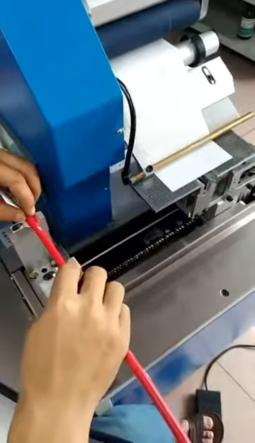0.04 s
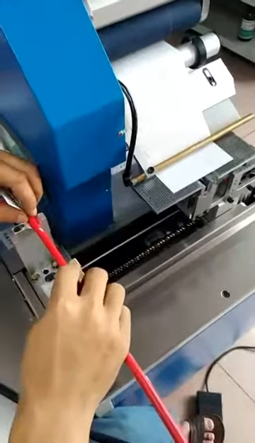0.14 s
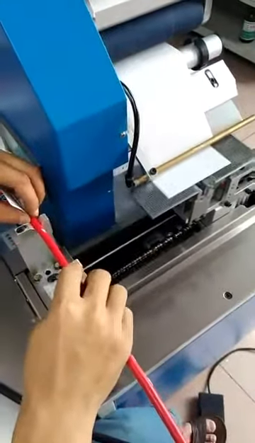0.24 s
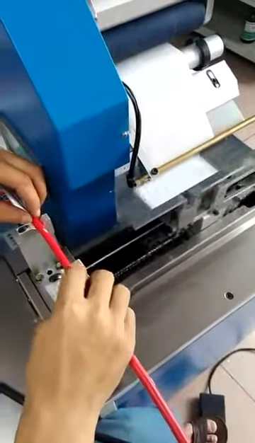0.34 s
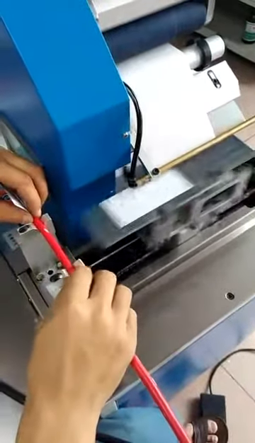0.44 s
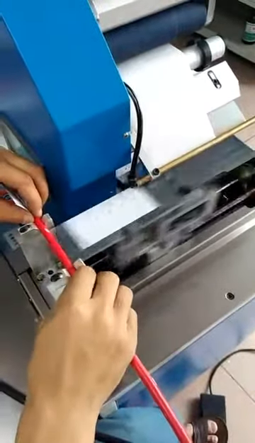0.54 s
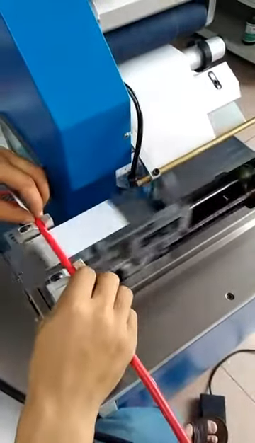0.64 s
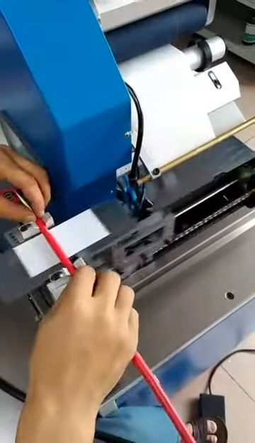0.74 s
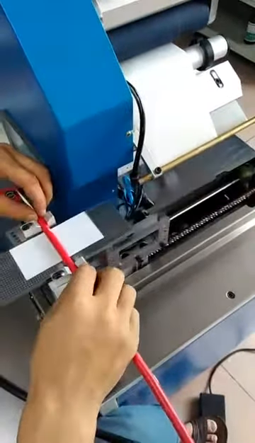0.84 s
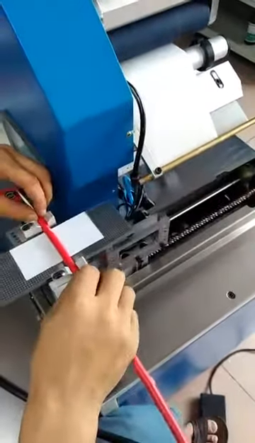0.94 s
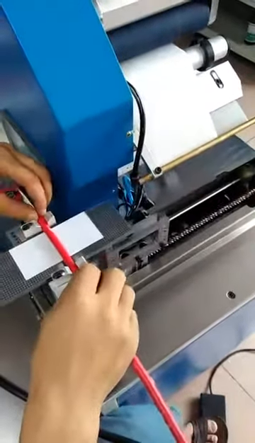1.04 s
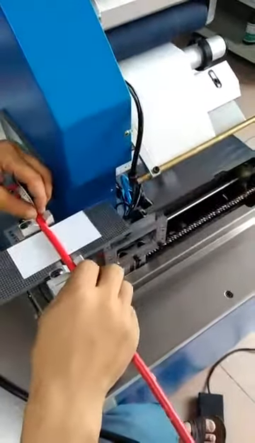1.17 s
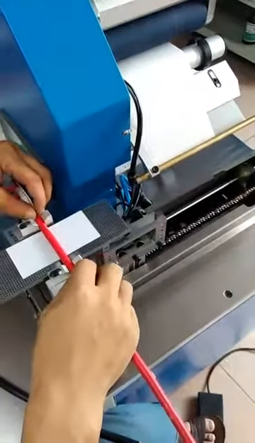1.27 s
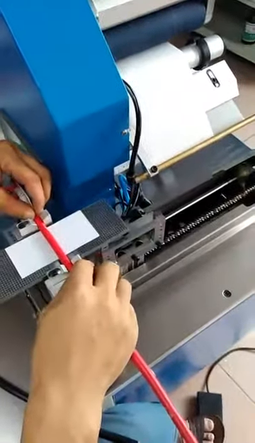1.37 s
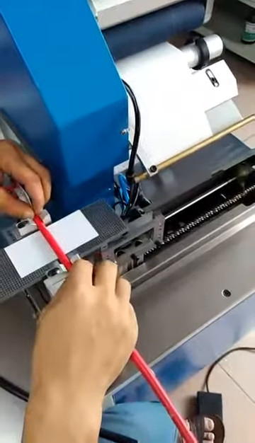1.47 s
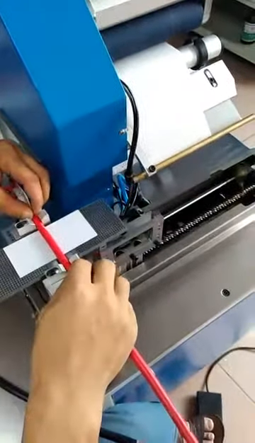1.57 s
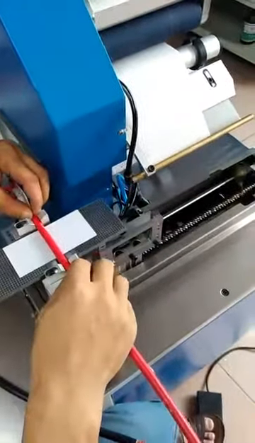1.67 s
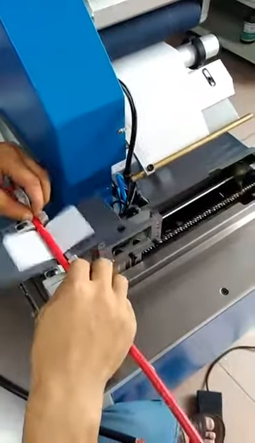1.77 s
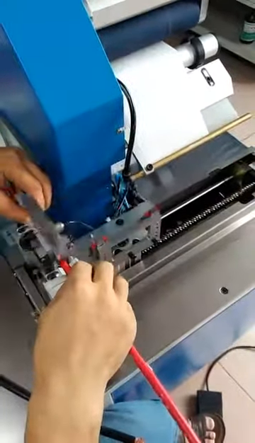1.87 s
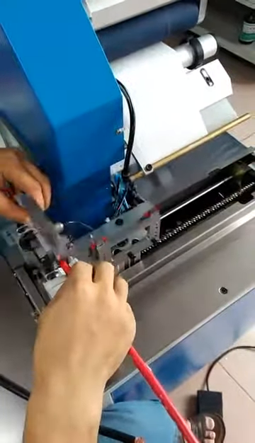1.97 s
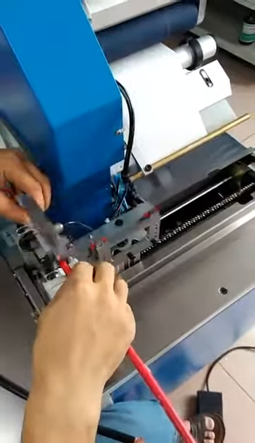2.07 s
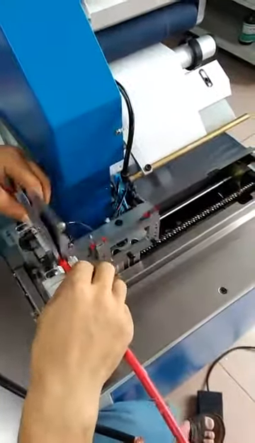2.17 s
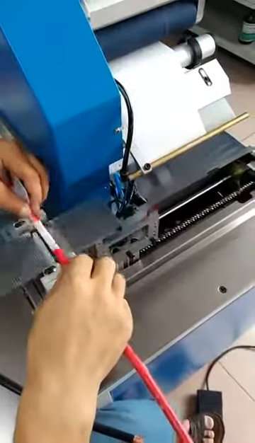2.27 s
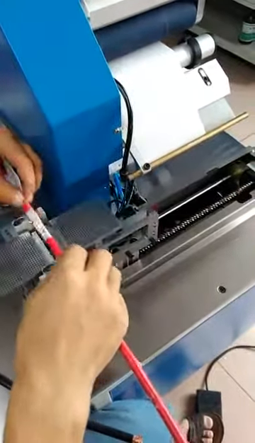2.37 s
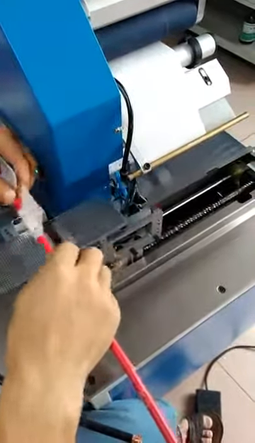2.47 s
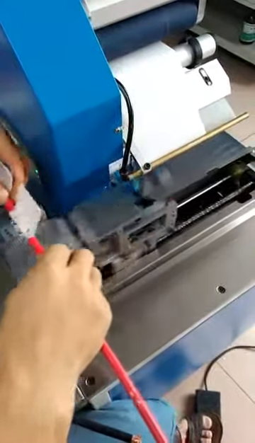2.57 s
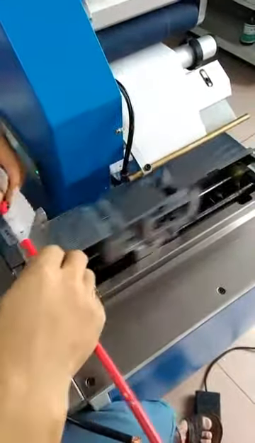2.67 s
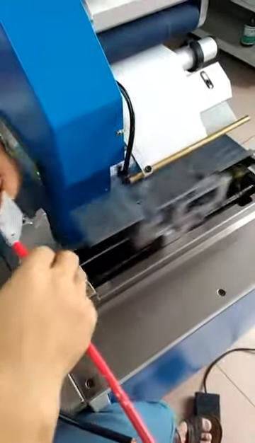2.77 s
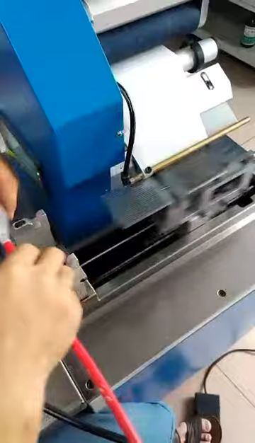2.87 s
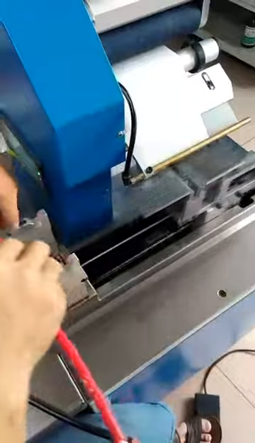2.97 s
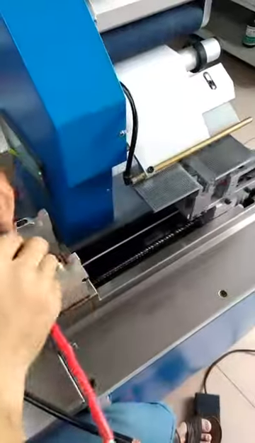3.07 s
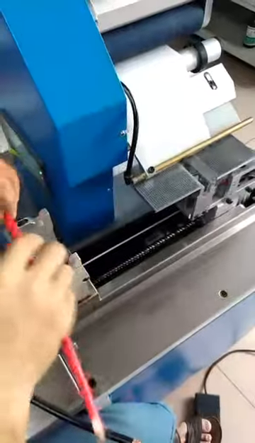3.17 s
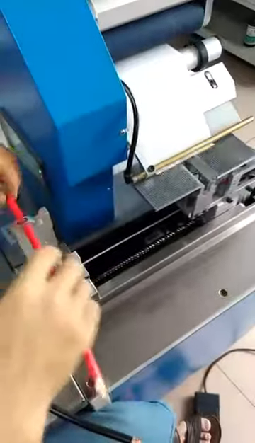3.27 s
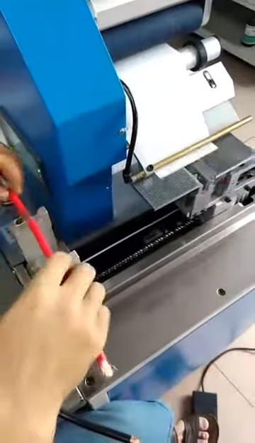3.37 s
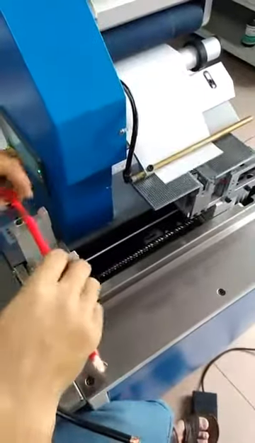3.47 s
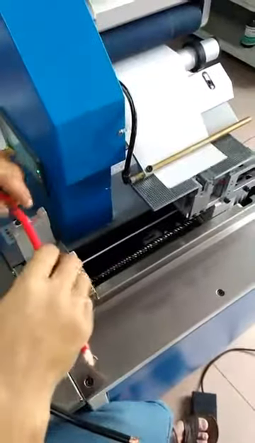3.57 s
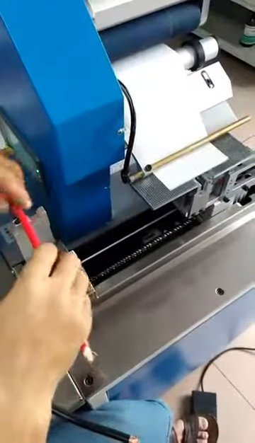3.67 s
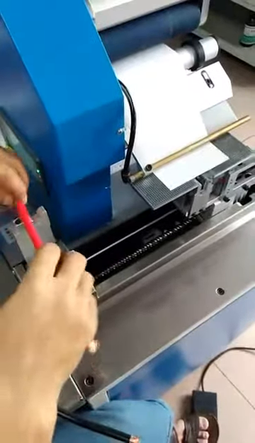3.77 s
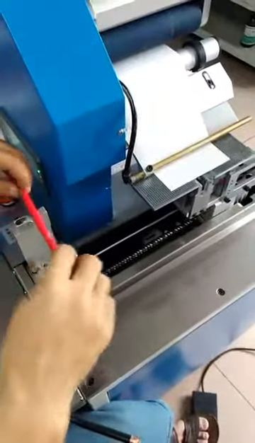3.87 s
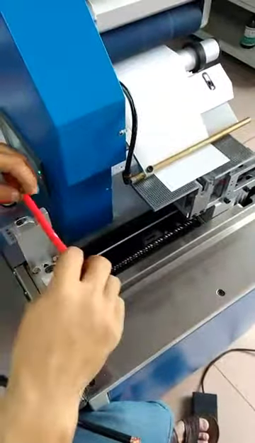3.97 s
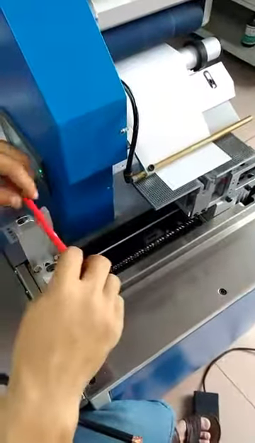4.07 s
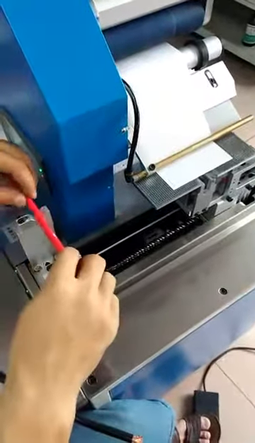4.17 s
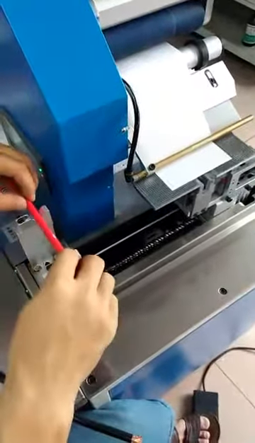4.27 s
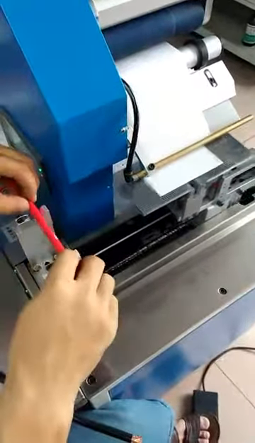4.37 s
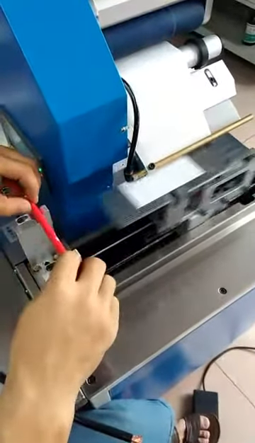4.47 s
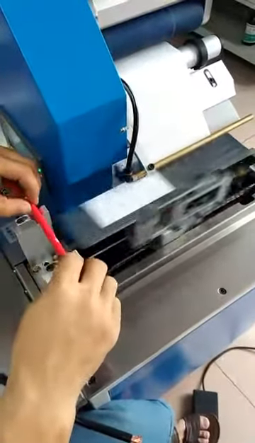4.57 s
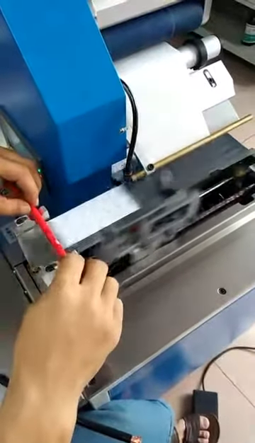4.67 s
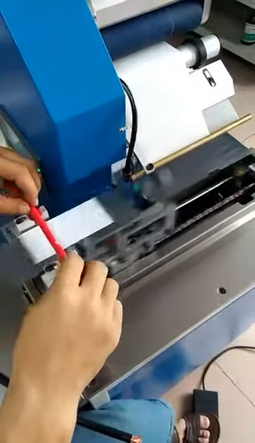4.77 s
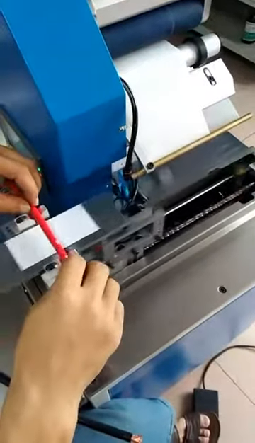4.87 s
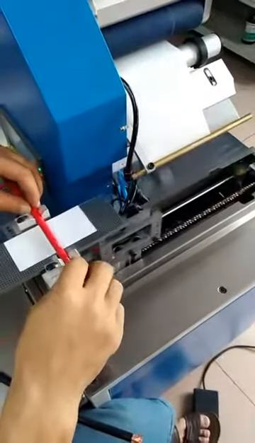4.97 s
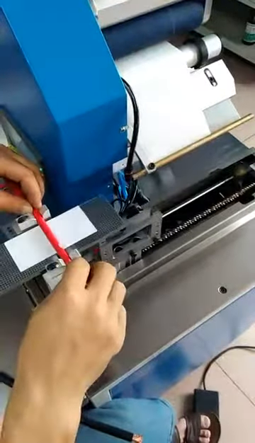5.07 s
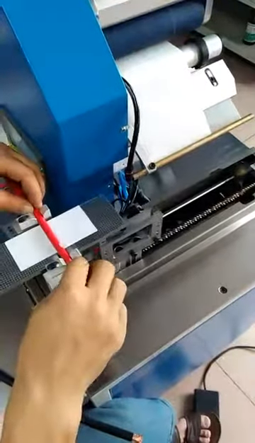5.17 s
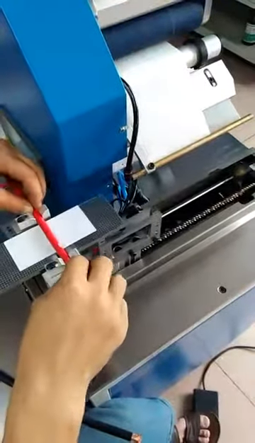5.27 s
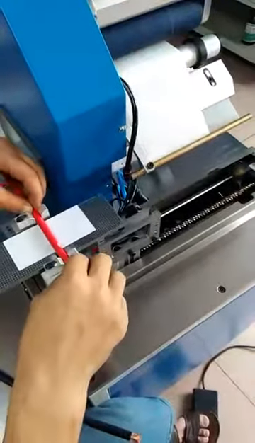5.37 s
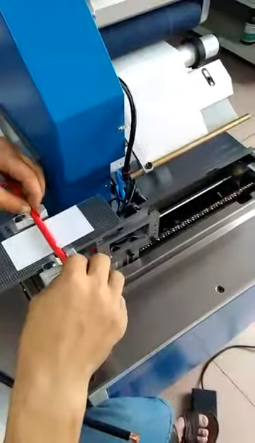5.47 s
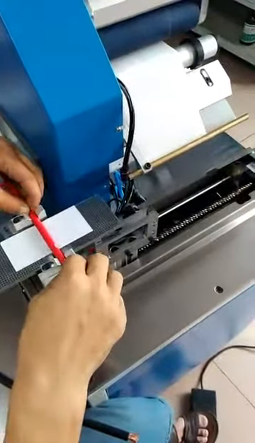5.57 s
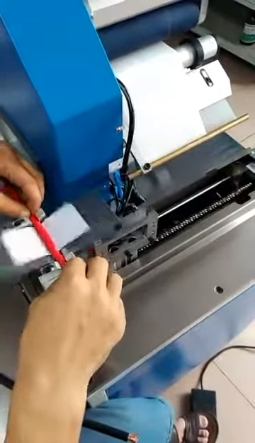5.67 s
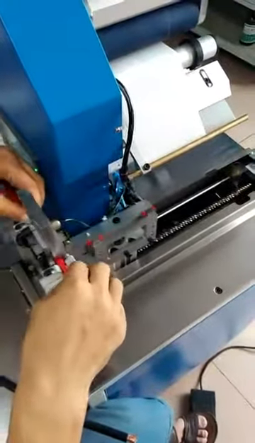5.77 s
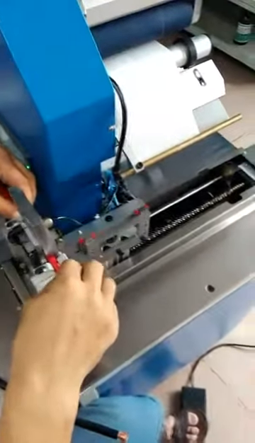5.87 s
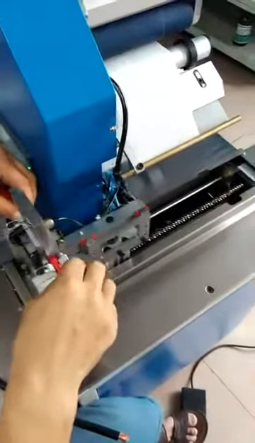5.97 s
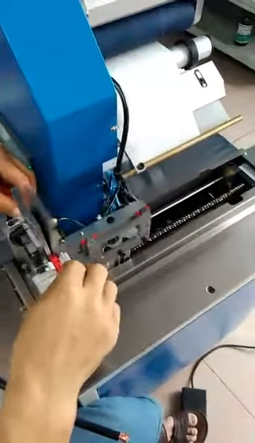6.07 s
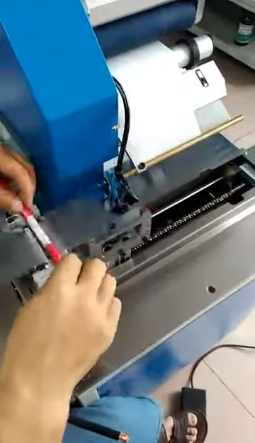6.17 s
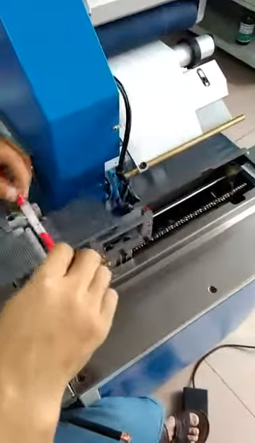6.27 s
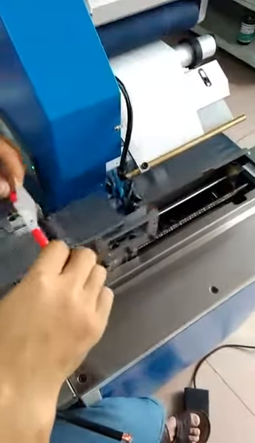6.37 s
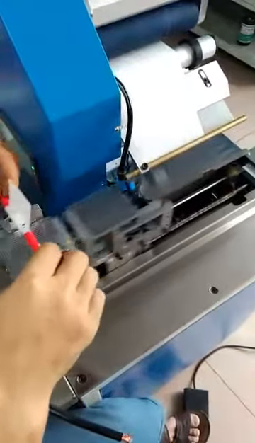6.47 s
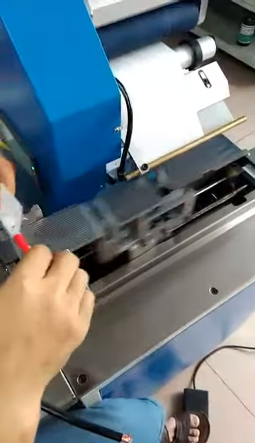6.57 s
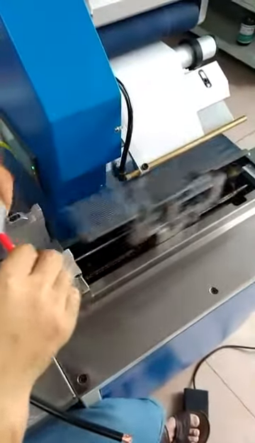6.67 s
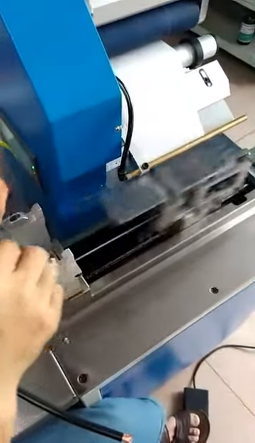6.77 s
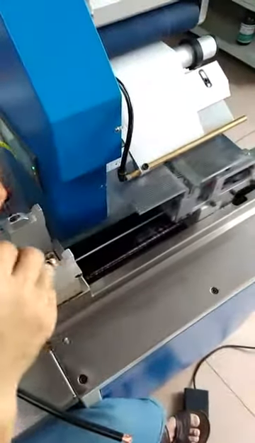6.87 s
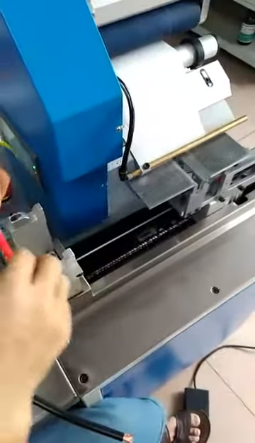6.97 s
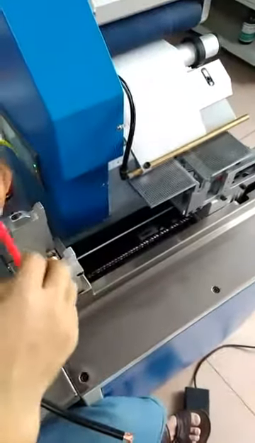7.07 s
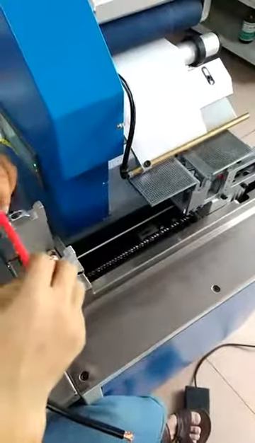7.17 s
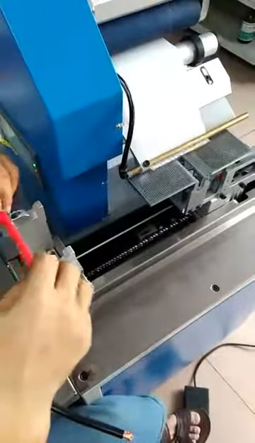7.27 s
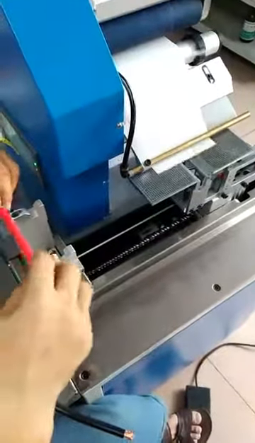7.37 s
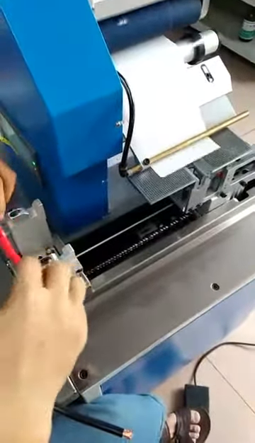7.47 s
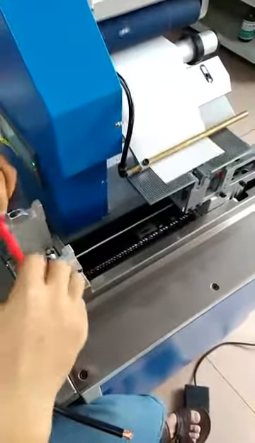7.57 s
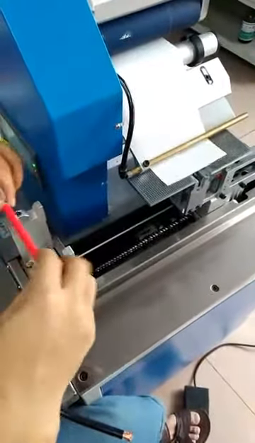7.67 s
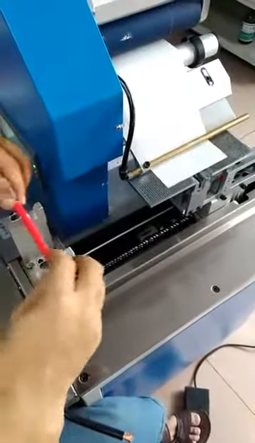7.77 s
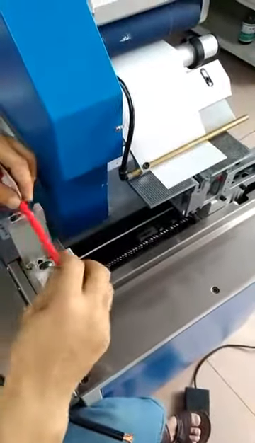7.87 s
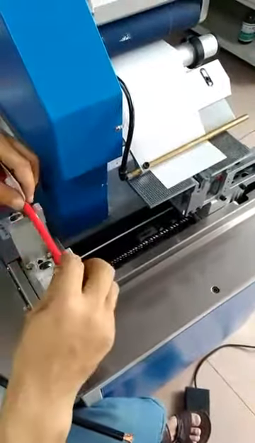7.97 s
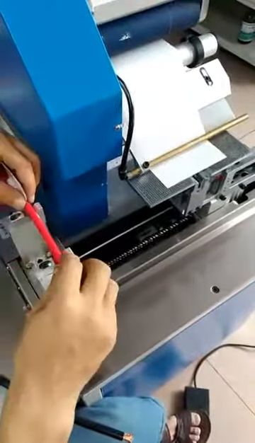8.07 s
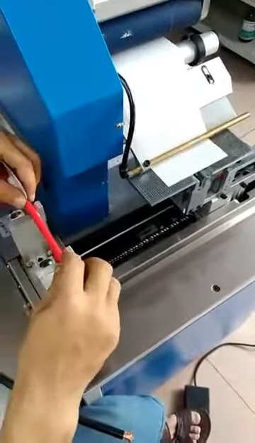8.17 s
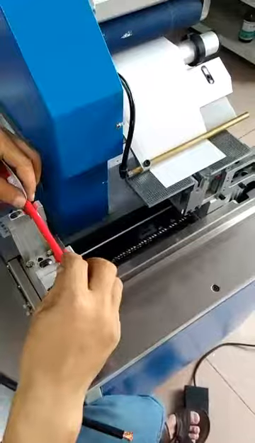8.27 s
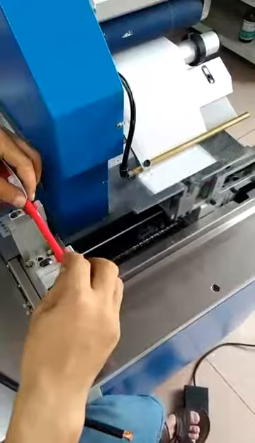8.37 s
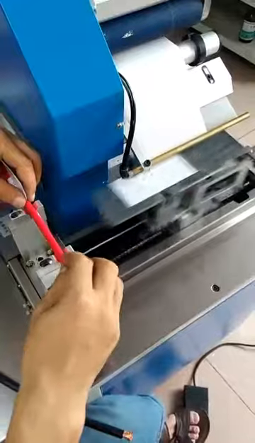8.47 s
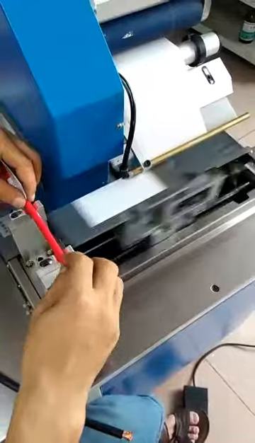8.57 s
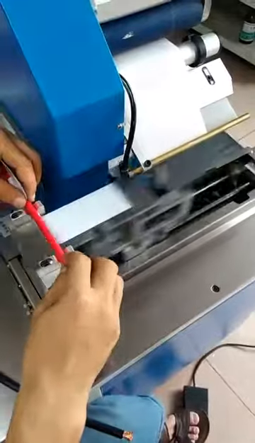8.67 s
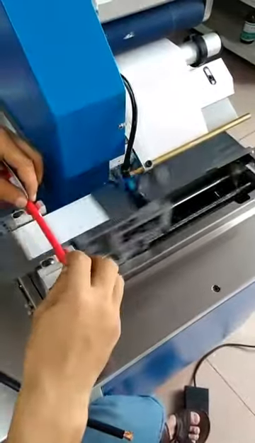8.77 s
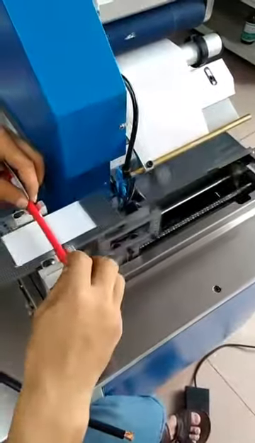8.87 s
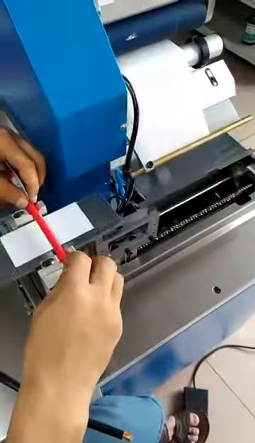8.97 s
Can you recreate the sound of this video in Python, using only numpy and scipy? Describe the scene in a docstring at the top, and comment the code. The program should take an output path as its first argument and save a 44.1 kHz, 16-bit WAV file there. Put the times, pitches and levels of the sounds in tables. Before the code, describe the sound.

A labeling machine cycles with a rising and falling motor whine, sharp metal clacks, hissing air and short air blasts in a workshop.

```python
"""An automatic labeling machine in a workshop, close to a stereo microphone; other machines drone farther off.
First a stepper motor runs the label carriage out over hissing air: its whine ramps up, holds, ramps down.
Near 2 s air cylinders fold the label plate with clacks and thuds, the hiss dies and the carriage returns.
Thin whistles come from down the shop, and wire and label web are handled. At 3.7 s the suction pad starts
with a blast of air and hisses on. The cycle plays again, and a third run out ends the scene."""
import sys
import numpy as np
from scipy import signal
from scipy.fft import rfft, irfft, next_fast_len
from scipy.io import wavfile

SR = 44100
rng = np.random.default_rng(int(sys.argv[2]) if len(sys.argv) > 2 else 0)


def persist_wave(psi):
    """Save psi, clipped to +-1, as 16-bit WAV."""
    counts = np.round(np.clip(psi, -1, 1) * 32767).astype(np.int16)
    wavfile.write(sys.argv[1], SR, np.atleast_2d(counts).T)


N = 397782


def amp(db):
    return 10 ** (np.asarray(db) / 20)


def rms_one(x):
    return x / np.sqrt(np.mean(x ** 2) + 1e-20)


def in_time(rows):
    """Each column after the time column, interpolated to one value a sample."""
    times, *columns = np.transpose(rows)
    return [np.interp(np.arange(N) / SR, times, column) for column in columns]


def span_gain(spans, fade_s):
    """Gain following each span of (time [s], ..., level [dB]) rows, fading to nothing outside it."""
    out, t = np.zeros(N), np.arange(N) / SR
    for rows in spans:
        start, end = rows[0][0], rows[-1][0]
        inside = np.interp(t, [start - fade_s, start, end, end + fade_s], [0, 1, 1, 0])
        out += inside * amp(in_time(rows)[-1])
    return out


def drift(corner_hz):
    """Random wander with a spread of 1: noise twice through a one-pole low-pass."""
    hop = 40
    pole = np.exp(-2 * np.pi * corner_hz * hop / SR)
    slow = signal.lfilter([1], [1, -2 * pole, pole * pole], rng.standard_normal(N // hop + 2002))[2000:]
    return np.interp(np.arange(N) / hop, np.arange(len(slow)), rms_one(slow))


def noise(spectrum, flicker_db):
    """Noise of a given spectral shape whose level flickers; rms 1."""
    size = next_fast_len(N)
    hz, points = np.fft.rfftfreq(size, 1 / SR) + 1, np.array(spectrum)
    shape = amp(np.interp(np.log(hz), np.log(points[:, 0]), points[:, 1], left=-90, right=-90))
    steady = irfft(rfft(rng.standard_normal(size)) * shape, size)[:N]
    return rms_one(steady * amp(flicker_db * drift(20.4)))


def resonance(x, hz, width_hz):
    """Band around hz, gain 1 at the peak."""
    r = np.exp(-np.pi * width_hz / SR)
    feedback = [1, -2 * r * np.cos(2 * np.pi * hz / SR), r * r]
    return signal.lfilter(np.array([1, 0, -1]) * (1 - r * r) / 2, feedback, x)


def narrow_noise(rows, taper):
    """One band of noise for each row, swelling and fading."""
    out = np.zeros(N)
    for start, end, hz, width_hz, db in rows:
        a, b = round(start * SR), min(round(end * SR), N)
        band = resonance(resonance(rng.standard_normal(SR), hz, width_hz), hz, width_hz)[-(b - a):]
        out[a:b] += amp(db) * rms_one(band) * signal.windows.tukey(b - a, taper)
    return out


# room tone of the workshop: (frequency [Hz], relative density [dB])
SHOP_SPECTRUM = [(18, -33.5), (30, 4), (71, -1.5), (148, 5), (229, -10), (300, 7.5), (377, -8), (569, 5.5),
                 (683, -1), (748, 4), (1950, -1.5), (2140, -3), (3450, -10.5), (3960, -13.5), (7000, -48),
                 (9100, -68.5), (15400, -120)]
SHOP_DB, HALL_DB, HALL_T60_S = -51, -16.5, 0.91


def workshop(machine):
    """Steady room tone that swells with the machine's late echo from the far walls."""
    decay = amp(-120 / (HALL_T60_S * SR))
    echo_power = signal.lfilter([1 - decay], [1, -decay], machine ** 2)
    gain = np.sqrt(amp(2 * SHOP_DB) + amp(2 * HALL_DB) * echo_power)
    return gain * noise(SHOP_SPECTRUM, flicker_db=1.2)


# other machines, far from the microphone: (time [s], pitch [Hz], level [dB])
FAR_DRONE = [(0, 82, -56), (.35, 84, -74), (.63, 82.4, -55), (.93, 82, -45), (1.18, 82.2, -50),
             (1.5, 84.8, -57.5), (1.93, 86.6, -46), (2.18, 84.8, -48), (2.35, 86, -68), (3.04, 86, -63),
             (3.6, 90, -77), (4.7, 88, -79), (4.95, 89, -65), (5.8, 86, -78), (6.2, 85, -63),
             (6.6, 90, -69.5), (7.6, 87, -60.5), (9.02, 83, -58.5)]


def far_drone():
    """One low tone whose level wavers."""
    pitch_hz, db = in_time(FAR_DRONE)
    return amp(db + 3 * drift(8)) * np.sin(2 * np.pi * np.cumsum(pitch_hz) / SR)


# whistles down the shop: (start [s], end [s], first pitch [Hz], last pitch [Hz], level [dB])
FAR_WHISTLES = [(2.109, 2.665, 2127, 2050, -48.5), (3.3, 3.47, 2340, 2390, -59.5),
                (3.572, 3.72, 2240, 2210, -57)]


def far_whistles():
    """Thin gliding tones that flutter in pitch and level."""
    spans = [[(start, first_hz, db), (end, last_hz, db)]
             for start, end, first_hz, last_hz, db in FAR_WHISTLES]
    pitch_hz = in_time(np.concatenate(spans))[0] * (1 + 0.0083 * drift(21.6))
    gain = span_gain(spans, fade_s=0.037) * amp(7.2 * drift(20))
    return gain * np.sin(2 * np.pi * np.cumsum(pitch_hz) / SR)


# faint tones around the machine: (start [s], end [s], frequency [Hz], width [Hz], level [dB])
FAINT_HUMS = [(0, .3, 5000, 800, -48.5), (.55, .8, 5050, 300, -48.5), (.8, 1.2, 5020, 250, -56),
              (.48, 1.147, 1025, 30.3, -50), (3.994, 4.2, 2094, 40, -54.5), (4.0, 4.3, 1584, 40, -55),
              (4.42, 4.621, 285, 24.3, -50.5), (4.93, 5.18, 434, 49.3, -46.5), (5.0, 5.45, 2620, 25, -63),
              (5.05, 5.5, 1599, 25, -62), (5.05, 5.4, 2090, 25, -61), (6.1, 6.27, 1835, 70, -53.5),
              (5.9, 6.079, 2550, 40, -60), (7.45, 7.7, 1540, 40, -61), (8.15, 8.35, 3100, 80.6, -52.5),
              (4.65, 4.899, 5100, 51, -57), (8.6, 8.8, 5050, 49.1, -54)]


def hums():
    """Narrow bands of noise that come and go."""
    return narrow_noise(FAINT_HUMS, taper=.5)


ROOM_T60_S, ROOM_DB, WALL_HZ = 0.49, -10.5, 5000


def room(machine):
    """Diffuse tail around the microphone: dying noise, dulled by the walls."""
    t = np.arange(SR) / SR
    tail = rng.standard_normal(SR) * amp(-60 * t / ROOM_T60_S) * np.minimum(t / 0.0046, 1)
    tail = signal.sosfilt(signal.butter(1, WALL_HZ, fs=SR, output="sos"), tail)
    return amp(ROOM_DB) * signal.fftconvolve(machine, tail / np.sqrt(np.sum(tail ** 2)))[:N]


# wire and label web handled nearby: (start [s], end [s], level [dB])
HANDLING_SPANS = [(3.104, 3.733, -56.5), (7.0, 7.698, -58.5)]
# their rubbing: (frequency [Hz], relative density [dB])
RUB_SPECTRUM = [(90, -25), (150, 6.5), (220, 2.5), (400, -9), (900, -5), (1600, -10.5), (2600, -25.5),
                (4000, -42)]


def handling():
    """Dull rubbing, lumpy enough to give soft knocks."""
    spans = [[(start, db), (end, db)] for start, end, db in HANDLING_SPANS]
    return span_gain(spans, fade_s=.08) * noise(RUB_SPECTRUM, flicker_db=5.)


# whistling resonances of the nozzle: (frequency [Hz], width [Hz], gain [dB])
NOZZLE_MODES = [(11140, 400, -1), (12000, 350, -4), (13000, 250, -7), (12740, 310, -1.5), (13600, 240, 1),
                (13500, 130, 5.5)]


def nozzle(air):
    """Air noise coloured by the nozzle resonances; rms 1."""
    return rms_one(air + sum(amp(db) * resonance(air, hz, width) for hz, width, db in NOZZLE_MODES))


# air flow as valves switch and the label covers or leaves the pad:
# (time [s], settling time [s], jet level [dB], pad level [dB])
AIR_FLOW = [(0, .01, -48.5, -48.5), (.3, 0.48, -52.5, -49), (.78, 0.22, -59.5, -57),
            (1.7, 0.19, -55, -51.5), (2.16, 0.43, -94, -87), (3.222, 0.014, -66, -59), (3.8, .1, -50, -43),
            (3.92, 0.14, -51, -50), (4.9, .3, -57, -55.5), (5.7, 0.067, -54.5, -51.5),
            (6.05, 0.25, -84.5, -78), (7.21, .012, -65.5, -59.5), (7.79, 0.078, -47.5, -42),
            (7.91, 0.15, -50.5, -49.5), (8.6, .4, -52.5, -54.5)]
# treble hiss of the jet: (frequency [Hz], relative density [dB])
JET_SPECTRUM = [(3530, -38), (6000, -18.5), (7940, -7.5), (10400, -4.5), (10900, -11), (11500, -3),
                (12700, -2.5), (13400, -4), (14000, -1.5), (14300, 1)]
# mid hiss of the pad: (frequency [Hz], relative density [dB])
PAD_SPECTRUM = [(1650, -16.5), (2800, 3), (3080, -1), (3620, -2.5), (4320, -2), (4570, -1), (5150, 0.5),
                (5760, -5), (7500, -10.5), (9750, -24.5), (16500, -120)]
RUSH_TREBLE_DB, RUSH_MID_DB, RUSH_POWER = -77, -63, 2.4   # carriage hiss at full speed; growth with speed


def suction_hiss(step_hz):
    """Close hiss that settles to each new air flow, plus a faint rush from the moving carriage."""
    levels = []
    for (start, settle_s, *new), (_, _, *old) in zip(AIR_FLOW, AIR_FLOW[:1] + AIR_FLOW):
        levels += [(start, *old), (start + settle_s, *new)]
    jet_db, pad_db = in_time(levels)
    rush = (step_hz / TOP_HZ) ** RUSH_POWER
    jet = (amp(jet_db) + amp(RUSH_TREBLE_DB) * rush) * nozzle(noise(JET_SPECTRUM, flicker_db=1.16))
    pad = (amp(pad_db) + amp(RUSH_MID_DB) * rush) * noise(PAD_SPECTRUM, flicker_db=0.1)
    return jet + pad


# openings of the suction valve: (start [s], length [s], level [dB])
VALVE_BLASTS = [(3.727, .097, -21.5), (7.712, 0.1, -21.5)]
# air of a blast: (frequency [Hz], relative density [dB])
BLAST_SPECTRUM = [(120, -49), (200, -29), (336, -9.5), (534, -21), (616, -6.5), (963, -18), (1680, -18),
                  (2400, -3.5), (3020, -9), (3420, -0.5), (4720, 1.5), (7790, -14), (13300, -5),
                  (14300, -7)]
BLAST_ATTACK_S, BLAST_SHUT_S, BLAST_SHUT_DB, BLAST_TAIL_S, BLAST_TAIL_DB = .011, 0.012, -19, 0.099, -37


def suction_blasts():
    """Air bursts through the nozzle as the valve opens, holds, drops sharply and trails off."""
    spans = []
    for start, length, db in VALVE_BLASTS:
        shut = start + length + BLAST_SHUT_S
        spans.append([(start, db - 20), (start + BLAST_ATTACK_S, db), (start + length, db),
                      (shut, db + BLAST_SHUT_DB), (shut + BLAST_TAIL_S, db + BLAST_TAIL_DB)])
    return span_gain(spans, fade_s=.004) * nozzle(noise(BLAST_SPECTRUM, flicker_db=-0.5))


# carriage runs: (start [s], hold [s], whine speeding up [dB], at full speed [dB], slowing down [dB])
CARRIAGE_RUNS = [(.26, .112, -50, -47.5, -52), (2.501, 0.1, -56.5, -41.5, -52),
                 (4.32, 0.12, -52.5, -46, -53.5), (6.38, .115, -57, -41, -55),
                 (8.31, .11, -53, -48.5, -52.5)]
TOP_HZ, CREEP_HZ, RAMP_S = 1254, 29.9, .293   # step rate at full speed and at rest; time between them
SLOW_LIFT_DB = 3   # the whine is stronger near standstill


def travel():
    """Step rate and whine gain of the motor: each run ramps up, holds and ramps down."""
    step_hz, gain, t = np.full(N, CREEP_HZ), np.zeros(N), np.arange(N) / SR
    for start, hold_s, up_db, top_db, down_db in CARRIAGE_RUNS:
        end = start + 2 * RAMP_S + hold_s
        speed = np.clip(np.minimum(t - start, end - t) / RAMP_S, 0, 1)
        ramp_db = np.where(t < start + RAMP_S, up_db, down_db) + SLOW_LIFT_DB * (1 - speed) ** 2
        near_top = np.clip((speed - .8) / .2, 0, 1)
        step_hz += (TOP_HZ - CREEP_HZ) * speed
        gain += np.clip(speed * 30, 0, 1) * amp(ramp_db + near_top * (top_db - ramp_db))
    return step_hz, gain


# rolling on each run: (level setting off [dB], level braking [dB])
ROLLING_LEVELS = [(-49.5, -52), (-58, -55), (-44, -54), (-63, -56.5), (-46, -51)]
# rolling on the rail: (frequency [Hz], relative density [dB])
RAIL_SPECTRUM = [(120, -50), (200, -50), (273, 5), (374, -3.5), (698, 1.5), (912, -3.5), (1120, -1.5),
                 (1840, 1), (2330, 0.5), (3180, -10), (3530, -11), (4680, -8.5), (7000, -73), (9100, -74),
                 (15400, -120)]
# brief noise bands going "out" or "back"; the first two going back stand for the motor whine
# ringing the frame as it speeds up, the others are scrapes:
# (time into the run [s], length [s], frequency [Hz], width [Hz], level [dB])
RUN_BANDS = {"out": [(.045, .11, 780, 450, -39), (.05, 0.11, 4560, 1500, -43.5),
             (.05, 0.16, 2200, 400, -45), (.25, 0.055, 2260, 250, -45), (.38, 0.1, 2400, 350, -52.5),
             (.62, .11, 1080, 700, -46.5)], "back": [(.035, 0.086, 970, 300, -51),
             (.115, .055, 2110, 250, -51.5), (.595, .06, 5020, 500, -53.5), (.61, .09, 1226, 900, -47)]}
SET_OFF_S, COAST_S, COAST_LOSS_DB = 0.16, .18, 1.5


def carriage():
    """The carriage rolls out and back in turn, ringing the frame a little; brief bands swell on each run."""
    rail = noise(RAIL_SPECTRUM, flicker_db=2.5)
    ringing = sum(amp(db) * resonance(rail, hz, width) for hz, width, db in FRAME_MODES)
    rolling = rms_one(rail + amp(-15) * ringing)
    spans, bands = [], []
    for run, ((start, hold_s, *_), (off_db, brake_db)) in enumerate(zip(CARRIAGE_RUNS, ROLLING_LEVELS)):
        braking = start + 1.5 * RAMP_S + hold_s
        spans.append([(start + .02, off_db - 17), (start + SET_OFF_S, off_db), (braking, brake_db),
                      (braking + RAMP_S / 2 + COAST_S, brake_db - COAST_LOSS_DB)])
        for after, length, *band in RUN_BANDS["back" if run % 2 else "out"]:
            bands.append((start + after, start + after + length, *band))
    return rolling * span_gain(spans, fade_s=0.012) + narrow_noise(bands, taper=0.45)


# harmonics of the motor: (multiple of the step rate, relative level [dB])
STEP_HARMONICS = [(1, -10), (2, -13.5), (3, -13.5), (4, -0.5), (5, -13), (6, -24), (10, -23), (11, -27)]
# resonances of the machine frame: (frequency [Hz], width [Hz], gain [dB])
FRAME_MODES = [(874, 256, 10), (1062, 61, 13.5), (1610, 590, 7.5), (2293, 193, 16.5), (2573, 140, 14.5),
               (2780, 270, 3), (3760, 77, 17), (4640, 440, 1.5), (5093, 160, -10), (5500, 240, 1),
               (6090, 560, -13), (7900, 360, -5), (12550, 200, -2), (13900, 160, 2)]


def stepper_motor(step_hz, gain):
    """Close whine: rough multiples of the step rate, heard mostly where they cross frame resonances."""
    ramping = np.clip(8 * (1 - step_hz / step_hz.max()), 0, 1)
    hunting = (.005 + .035 * ramping) * drift(260)   # the rotor hunts while it gains or sheds speed
    phase = 2 * np.pi * np.cumsum(step_hz * (1 + hunting)) / SR
    tones = np.zeros(N)
    for order, db in STEP_HARMONICS:
        level = gain * amp(db + 2.5 * drift(30))
        roughness = 1 + (.4 + .3 * ramping) * drift(150)
        tones += level * roughness * np.sin(order * phase)
    ringing = sum(amp(db) * resonance(resonance(tones, hz, 2.35 * width), hz, width)
                  for hz, width, db in FRAME_MODES)
    direct = signal.sosfilt(signal.butter(2, [700, 6000], "band", fs=SR, output="sos"), tones)
    return ringing + amp(-20.5) * direct


# modes of the struck groups (clamp, plate, brackets, frame, bright crack, covers, bench):
# (frequency [Hz], width [Hz], gain [dB])
GROUP_MODES = [
    [(4825, 340, 1.5), (5050, 170, -1), (5320, 150, -1), (5730, 180, -1)],
    [(3660, 310, -5), (3880, 140, -1.5), (4106, 69, -2)],
    [(1790, 120, -1), (2189, 170, 3.5), (2560, 200, 0.5), (2930, 68, -3.5), (3110, 370, 0)],
    [(777, 270, -6), (986, 150, 1.5), (1210, 110, 1), (1445, 31, -7)],
    [(7070, 3000, -2.5), (10070, 4800, -2.5), (13400, 3500, -1.5)],
    [(317.3, 30, 0.5), (443, 50, 2.5)],
    [(85.5, 47, 0), (143.6, 11, -3)],
]
# response of each group: (lift [dB], delay [ms], rattle level [dB], rattle decay [ms], steady push [0-1])
GROUP_RESPONSE = [(-1.5, 0.23, -26.5, 38, 0.2), (3, 0., -13.5, 36, 0.13), (3.5, 0.86, -19.5, 33, 0.4),
                  (2.5, 1.5, -17, 44, 0.34), (3.5, 0.079, -11.5, 48, 0.35), (6, 0.2, -27.5, 47, 0.3),
                  (-7, 0, -25.5, 40, 1)]
# kinds of metal contact: (level in each of the seven groups [dB], chatter decay [ms])
CONTACT_KINDS = { "carriage jerks": (-28, -30.5, -31.5, -34, -50, -38, -48, 5),
                 "cylinder thuds": (-44, -37, -39, -44, -52, -40, -31.5, 7),
                 "clamp shuts": (-23.5, -26.5, -35, -56, -41, -33, -44, 8),
                 "plate snaps over": (-9, -35, -10.5, -20.5, -22.5, -35, -42, 2),
                 "plate rebounds": (-55, -42, -49, -25, -66, -43, -49, 9.5),
                 "plate lets go": (-27, -33.5, -31, -27.5, -36, -41.5, -28.5, 4.5),
                 "plate lands": (-24.5, -26.5, -33, -25.5, -35.5, -34.5, -38.5, 7.5),
                 "valve ticks": (-43, -37.5, -44, -42, -49, -45.5, -73, 9),
                 "carriage stops": (-44, -38, -35.5, -32, -45, -37.5, -45, 7.5),
                 "carriage docks": (-36, -36.5, -27.5, -31, -53.5, -61, -43, 12.5),
                 "suction opens": (-28, -42, -29.5, -15.5, -27.5, -27.5, -38.5, 7),
                 "suction shuts": (-15, -30, -22, -49, -21, -29, -37, 4.5)}
# when each kind strikes: (time [s], relative level [dB])
CONTACT_TIMES = { "carriage jerks": [(.3104, -3), (.3205, -2.5), (.3496, -1.5), (.384, -5.5), (4.388, -2),
                 (4.4289, -2.5), (8.362, -9), (8.3749, -2)], "cylinder thuds": [(1.8126, -0.5),
                 (5.6945, -1)], "clamp shuts": [(1.8285, -5.5), (5.7049, 1)],
                 "plate snaps over": [(1.9614, 0.5), (5.8341, 1)], "plate rebounds": [(1.9717, 3.5),
                 (5.8424, -6.5)], "plate lets go": [(2.2131, -1), (6.088, 1.5)],
                 "plate lands": [(2.2255, 1.5), (6.101, 1.5)], "valve ticks": [(2.4037, 0.5), (6.2782, 0.5),
                 (6.6653, -6.5)], "carriage stops": [(4.9579, -1)], "carriage docks": [(7.076, -1)],
                 "suction opens": [(3.7326, -5.5), (7.7171, 0)], "suction shuts": [(3.8294, 2),
                 (7.8099, -1.5)]}
TOUCH_MS = 1.03   # a contact builds up over this time


def clacks():
    """Metal contacts right by the microphone: chatter and a rattling tail shake each group's modes."""
    out, ms = np.zeros(N), 1000 * np.arange(SR // 3) / SR
    for group, modes in enumerate(GROUP_MODES):
        lift_db, delay_ms, rattle_db, rattle_ms, push = GROUP_RESPONSE[group]
        envelope = np.full(N + SR, 1e-9)
        for kind, (*levels_db, chatter_ms) in CONTACT_KINDS.items():
            burst = np.exp(-ms / max(chatter_ms, .5)) + amp(rattle_db) * np.exp(-ms / rattle_ms)
            burst *= np.minimum(ms / TOUCH_MS, 1)
            for start, db in CONTACT_TIMES[kind]:
                onset = round((start + delay_ms / 1000) * SR)
                envelope[onset:onset + len(burst)] += amp(levels_db[group] + lift_db + db) * burst
        force = envelope[:N] * (push + (1 - push) * rng.standard_normal(N))
        for hz, width_hz, db in modes:
            makeup = np.sqrt(SR / (np.pi * width_hz * len(modes)))   # a narrow mode takes in less noise
            out += amp(db) * makeup * resonance(resonance(force, hz, 3 * width_hz), hz, width_hz)
    return out


SIDE_DB, SIDE_HZ = -8, 6000


def scene():
    """The machine up close, the workshop behind; the two microphone ports differ only in the treble."""
    step_hz, whine_gain = travel()
    machine = clacks() + stepper_motor(step_hz, whine_gain) + carriage()
    machine += suction_hiss(step_hz) + suction_blasts() + handling()
    mid = machine + room(machine) + workshop(machine) + far_drone() + far_whistles() + hums()
    treble_only = signal.butter(10, SIDE_HZ, "high", fs=SR, output="sos")
    side = amp(SIDE_DB) * signal.sosfilt(treble_only, mid * drift(200))
    return np.array([mid + side, mid - side])


BASS_CUT_HZ, TOP_CUT_HZ = 50, 14750


def record(dry):
    """The microphone drops the deepest bass; the top is cut steeply."""
    dry = signal.sosfilt(signal.butter(2, BASS_CUT_HZ, "high", fs=SR, output="sos"), dry)
    return signal.sosfilt(signal.cheby2(24, 90, TOP_CUT_HZ, fs=SR, output="sos"), dry)


dry = scene()
out = record(dry)
persist_wave(out)
```